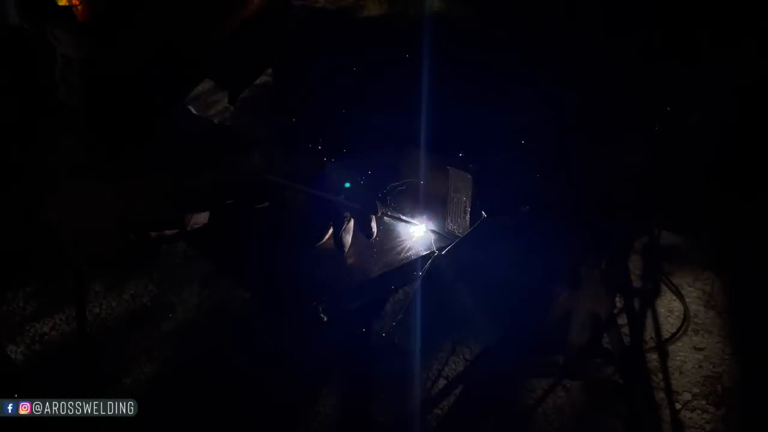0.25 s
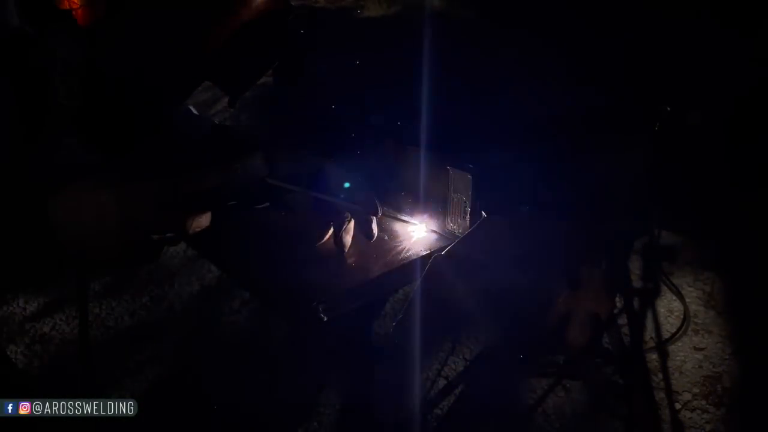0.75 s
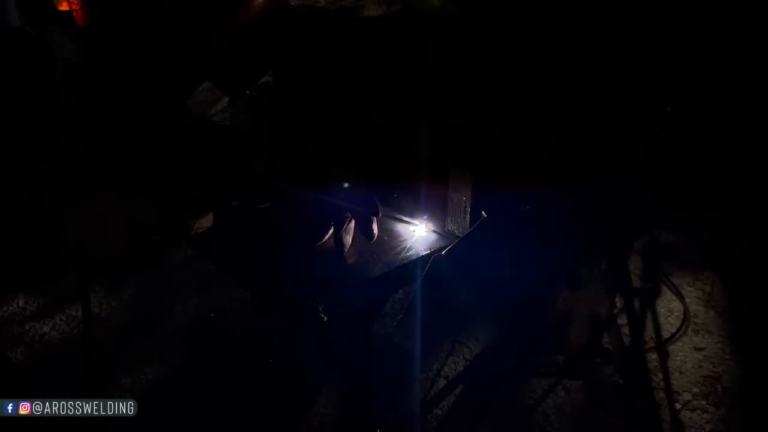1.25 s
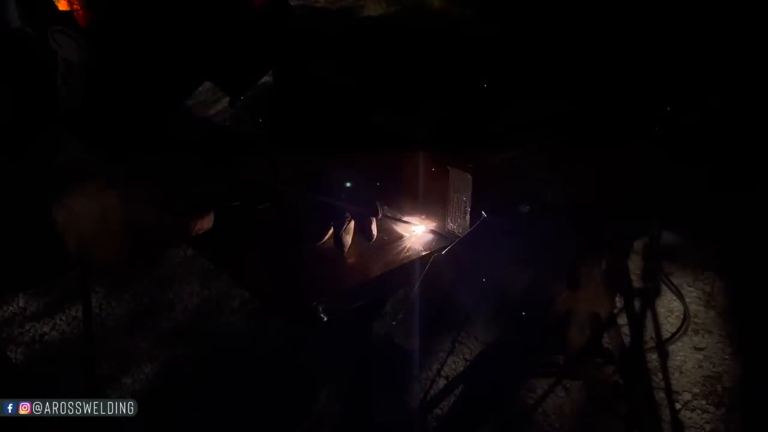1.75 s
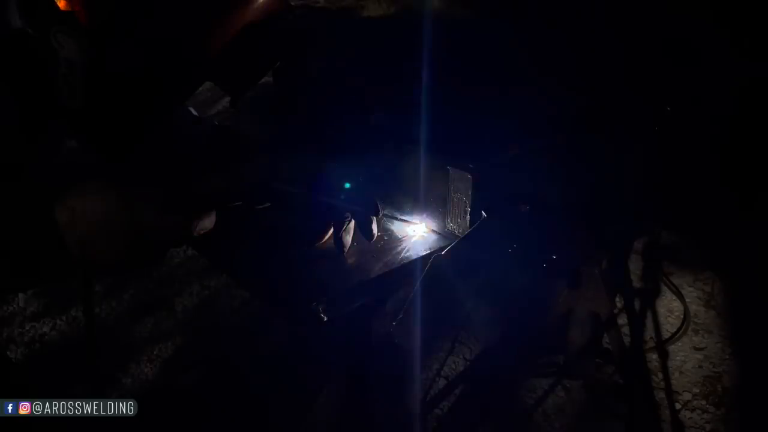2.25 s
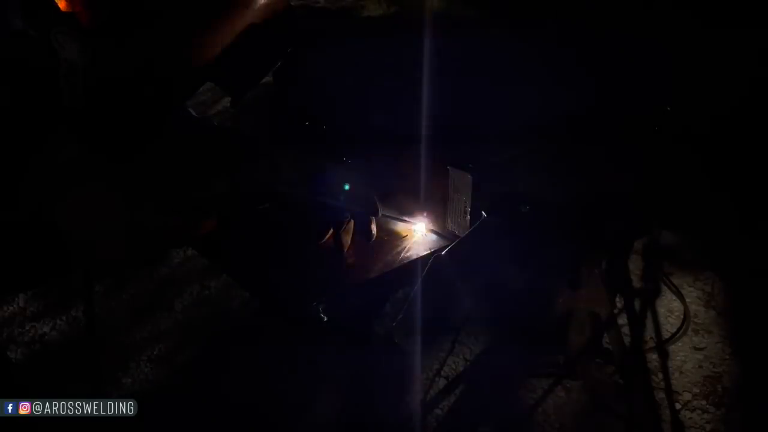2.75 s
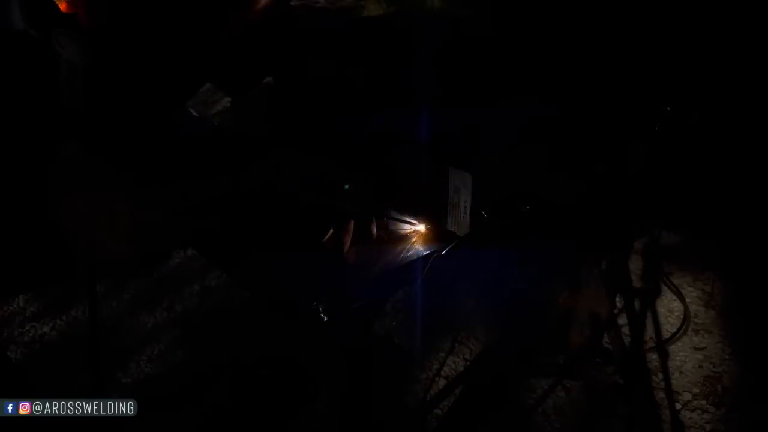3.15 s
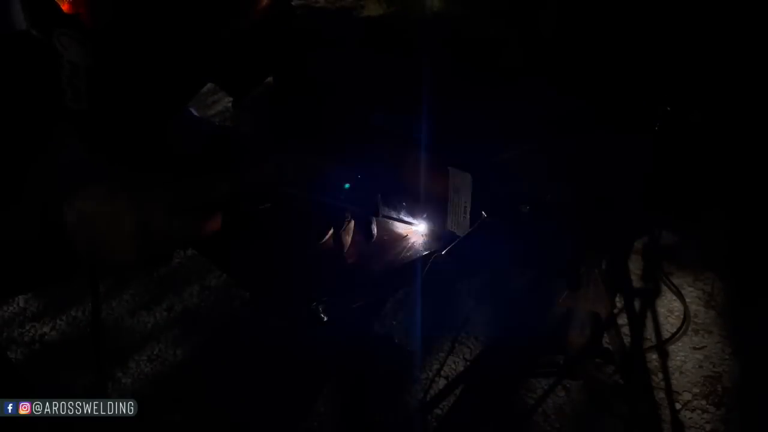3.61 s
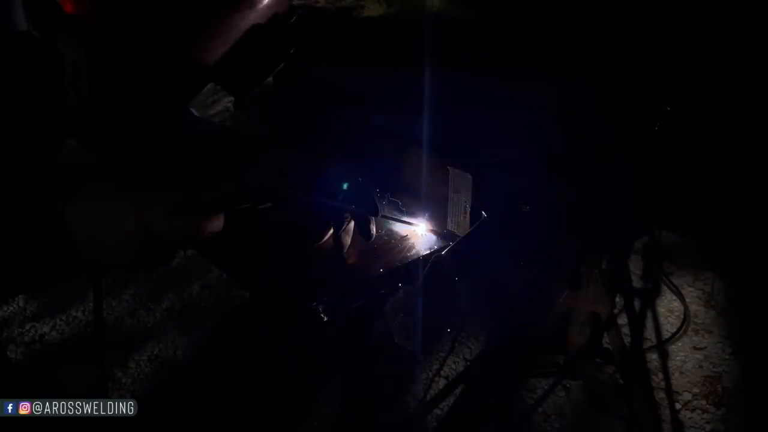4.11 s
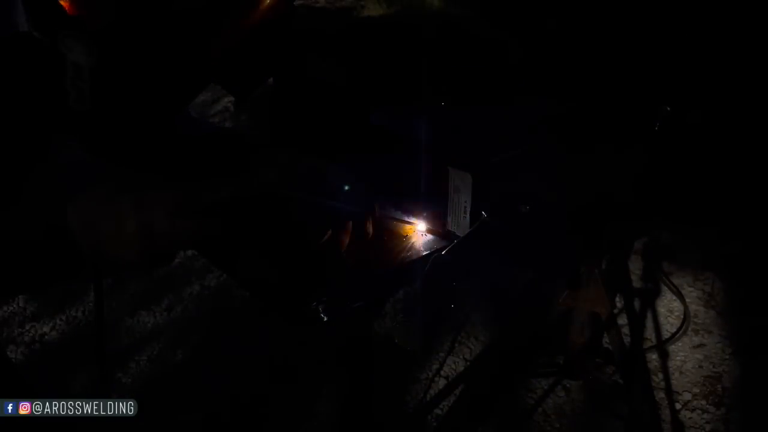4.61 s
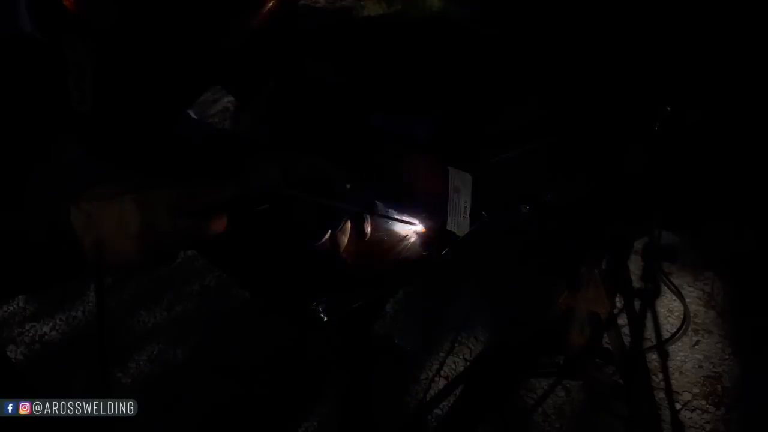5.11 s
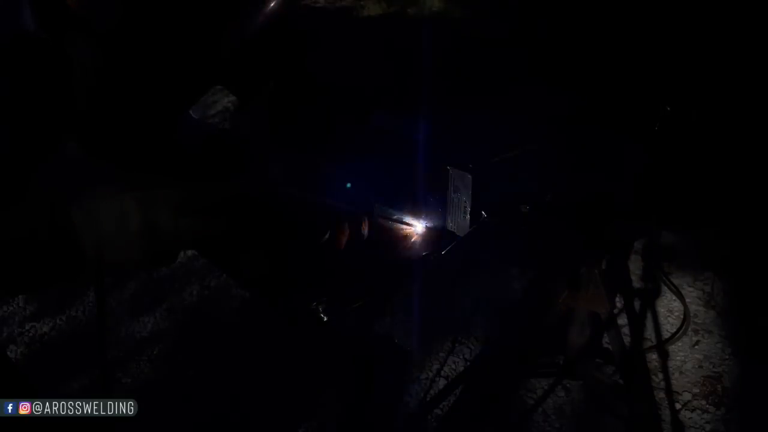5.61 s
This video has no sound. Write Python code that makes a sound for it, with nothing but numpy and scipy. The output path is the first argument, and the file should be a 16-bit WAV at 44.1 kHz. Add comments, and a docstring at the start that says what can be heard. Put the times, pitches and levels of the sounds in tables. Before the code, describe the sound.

Outdoors, an engine-driven welder holds a steady low hum near 59 hertz with a soft noisy roar. Over it a stick arc hisses and crackles brightly on steel, throwing clusters of dry, loud snaps with short fizz and faint metallic ring. From about two seconds wind gusts buffet the microphone in low thumps, making the hum waver and the level dip briefly. Stereo pair, exposed to the wind.

```python
"""The steady drone of an engine-driven welder outdoors is heard first, with a stick arc sizzling on steel.
The engine is exhaust tones locked to its firings over a band of noisy roar.
The arc is hiss and dense crackle, with louder spits that crack, fizz, thud and ring the workpiece.
Gusts buffet the two ports and make the hum waver; single puffs strike, and the level dips briefly three times.
A spaced microphone pair takes engine and arc with a level and phase difference that varies with frequency."""
import sys
import numpy as np
from scipy import signal
from scipy.fft import rfft, irfft, next_fast_len
from scipy.io import wavfile
from scipy.ndimage import uniform_filter1d, map_coordinates

SR = 44100
rng = np.random.default_rng(int(sys.argv[2]) if len(sys.argv) > 2 else 0)


def transcribe(signal):
    """Save signal, clipped to [-1, 1], as a 16-bit WAV file at the path in sys.argv[1]."""
    frames = np.atleast_2d(signal).T
    limited = np.clip(frames, -1, 1)
    pcm = np.round(limited * 32767).astype(np.int16)
    wavfile.write(sys.argv[1], SR, pcm)


N = 258426

# Engine speed: (time [s], firing rate [1/s])
FIRING_RATE = [(0, 58.705), (2, 58.71), (3.8, 58.74), (5.86, 58.77)]
# Lowest exhaust tone as heard through the wind, wavering as gusts beat with it and sinking in the dips:
# (time [s], level before the pair's tilt [dB rms])
HUM_LEVEL = [(0.0, -17), (1.8, -16.5), (1.86, -20.5), (1.91, -18.5), (1.98, -22), (2.08, -16.5),
             (2.12, -21), (2.16, -16), (2.21, -19), (2.25, -15.5), (2.35, -17.5), (2.39, -16.0),
             (2.44, -18), (2.49, -18.5), (2.53, -20.0), (2.59, -16.5), (2.71, -28.5), (2.75, -19),
             (2.78, -27), (2.82, -16), (2.85, -25), (2.89, -20), (2.94, -21.5), (3.03, -15.5),
             (3.13, -19.5), (3.17, -15.5), (3.21, -21.5), (3.25, -15.5), (3.29, -20), (3.33, -15),
             (3.37, -19), (3.43, -22), (3.47, -18), (3.5, -22.5), (3.57, -14), (3.62, -25), (3.65, -18),
             (3.68, -17.0), (3.74, -22), (3.8, -23), (3.9, -14.5), (4.01, -17), (4.06, -19), (4.16, -16),
             (4.19, -16), (4.23, -23.5), (4.31, -21), (4.42, -18.5), (4.46, -16), (4.56, -22.0),
             (4.59, -14), (4.62, -21), (4.65, -15.5), (4.69, -18), (4.72, -15), (4.78, -18.5),
             (4.83, -16.5), (4.87, -20.5), (4.93, -15.5), (4.97, -18), (5.01, -16), (5.05, -18.5),
             (5.16, -16.5), (5.21, -19.5), (5.27, -16.5), (5.33, -18.5), (5.45, -15.5), (5.49, -18.5),
             (5.63, -17), (5.85, -16.5)]
# Exhaust overtones at the opening load; halves and quarters come from unequal cylinders:
# (multiple of the firing rate [-], level [dB rms])
OVERTONES = [(2, -31), (2.25, -38), (2.5, -46.5), (3, -27), (3.25, -45.5), (3.5, -43), (3.75, -48.5),
             (4, -40), (5, -51), (5.5, -53), (6, -40), (6.5, -53), (7, -41.5), (7.5, -50.5), (8, -52.5),
             (9, -46), (9.25, -47), (10, -41), (11, -50)]
# Colour of engine noise and casing: (frequency [Hz], relative density [dB per Hz])
ROAR_COLOUR = [(30, -30), (60, -14.5), (200, -5.5), (300, -8.5), (440, -5.5), (500, -12.5), (600, -9.5),
               (850, -11.5), (980, -15.5), (1230, -13), (1420, -17.5), (2600, -18), (4200, -25.5),
               (16000, -38)]
# Engine roar, the overtones following: (time [s], level [dB rms])
ENGINE_LOAD = [(0, -28), (2, -28), (2.4, -28), (3.3, -30.5), (4.2, -28), (5.86, -29)]
# Colour of the arc: (frequency [Hz], relative density [dB per Hz])
ARC_COLOUR = [(500, -40), (1500, -14), (2000, -9.5), (2350, -3.5), (2700, -3), (3000, -8.5), (3250, -7),
              (4000, -8.5), (4350, -11.5), (5050, -4.5), (5700, -8.5), (6300, -4.5), (6550, -6), (6900, 1),
              (7400, -1.5), (7750, -.5), (8050, -6), (8400, -3), (9300, -3.5), (10200, -7), (10600, -10.5),
              (10850, -8.5), (11800, -14), (12600, -12.5), (13600, -16.5), (14500, -9), (15650, -9),
              (15850, -16)]
# How the arc burns: (time [s], gain of the sizzle [dB], gain of the arc's highest band [dB])
BURN = [(0, -27.5, -4), (.3, -35.5, -4), (.5, -31, -6), (.92, -33.5, -3.5), (1.4, -30.5, -3),
        (1.6, -31, -5), (1.8, -29.5, -1), (2.2, -33.5, -6), (2.3, -30.5, -4), (2.6, -33.5, -5),
        (2.72, -33, -2), (2.81, -30.5, -3), (3.05, -37, -1), (3.45, -33.5, 0), (4.0, -35, 0),
        (4.25, -36, 0), (4.4, -32.5, 2), (4.7, -37.5, -1), (5.15, -32, -2), (5.5, -36, 1.5), (5.86, -34, 1)]
# Loud spits before brightening: (time [s], peak of the upper part [dB], lower part's peak against it [dB])
LOUD_SPITS = [(0.061, -12, -20), (0.066, -12, -14), (0.0866, -14, -19), (0.1048, -15, -17),
              (0.1166, -5, -21), (0.146, -11, -8), (0.185, -17, -6), (0.2364, -10, -7), (0.241, -10, -7),
              (0.3433, -5.5, -6), (0.3536, -8, -8), (0.3576, -1.5, -7.5), (0.3688, -2.5, -18),
              (0.436, -20, 2), (0.4617, -12, -20), (0.4635, -16, -11), (0.485, -8, -12), (0.4866, -8, -7),
              (0.5149, -10, 0), (0.5237, -8, -13), (0.5268, -5.5, -9), (0.538, -16, -11),
              (0.5787, -8.5, -13), (0.5927, -3, -12), (0.6043, -4.5, -7.5), (0.6099, -3, -12),
              (0.6996, -12, -10), (0.7147, -6, -16), (0.7281, -8, -11), (0.7432, -10, -16),
              (0.8249, -8, -7), (0.8482, -12, -4), (0.857, -9.5, -3), (0.8684, -6.5, -6), (0.8717, -6, -19),
              (0.8735, -5, -18), (0.877, -7, -12), (0.8786, -12.5, -14), (0.949, -1.5, -16),
              (0.9584, -3.5, -20), (1.0131, -8, -17), (1.016, -11, -11), (1.0243, -9, -15),
              (1.031, -6, -12), (1.039, -4, -21), (1.0413, -10, -16), (1.0533, -1.5, -27),
              (1.0594, -16, -16), (1.135, -6.5, -8), (1.1448, -10, -10), (1.1524, -2, -12),
              (1.1984, -8, -18), (1.2381, -9, -9), (1.2607, -6, -7), (1.275, -20, -19), (1.32, -9, -17),
              (1.3229, -13, -13), (1.3567, -18, -14), (1.3762, -16, -12), (1.4013, -13, -18),
              (1.4034, -13, -16), (1.422, -9, -13), (1.426, -12.0, -12), (1.4314, -8, -14),
              (1.4497, -11, -12), (1.4529, -7, -9), (1.4605, -7, -14), (1.4648, -19, -16),
              (1.4737, -23, -15), (1.5565, -5, -10), (1.5581, -4.5, -6), (1.5634, -12.0, -17),
              (1.697, -13.0, -14), (1.708, -2.5, -11), (1.711, -6, -9), (1.7128, -8.5, -18),
              (1.7189, -13.5, -13), (1.763, -7, -22), (1.767, -11, -18), (1.7807, -6, -5.5),
              (1.7924, -3, -11), (1.795, -9, -16), (1.8015, -15, -11), (1.808, -3, -10), (1.8148, -2, -11),
              (1.882, -4, -12), (1.8929, -3, -7), (1.8948, -2, -10), (1.943, -12, -16), (1.9915, -9, -7),
              (2.1056, -11, -18), (2.119, -9, -14), (2.1629, -5, -6), (2.1732, -11, -6),
              (2.1752, -4.5, -20), (2.187, -14, 4), (2.3547, -6.5, -15), (2.362, -13, -15),
              (2.3649, -9, -12), (2.3737, -2, -10), (2.3763, -16, -11), (2.3775, -2.5, -13),
              (2.382, -6, -16), (2.4804, -6, -13), (2.4856, -5, -9), (2.4905, -3, -9), (2.5132, -13.0, -18),
              (2.514, -12, -16), (2.5174, -4.5, -23), (2.521, -5, -12), (2.543, -9, -13), (2.548, -6, -10),
              (2.5678, -7, -10), (2.6, -11, -8), (2.61, -12, -14), (2.6223, -5.5, -12), (2.637, -5, -21),
              (2.641, -3, -17), (2.6425, -6, -8), (2.826, -5, -12), (2.8399, -6.5, -16),
              (2.8493, -9.5, -12), (2.8555, -8, -11), (2.8638, -11.5, -6), (2.871, -9.0, -12),
              (2.8755, -6, -10), (2.882, -3, -13), (2.889, 0, -11.5), (2.8925, -5, -17), (2.8984, -9, -5),
              (2.917, -14, -9), (3.0322, -8, -14), (3.0384, -6, -12), (3.061, -5, -11), (3.0637, -4, -14),
              (3.1358, -4, -16), (3.14, -9, -9), (3.144, -8, -12), (3.1484, -5.5, -13), (3.156, -9, -13),
              (3.1582, -7, -10), (3.1643, -3.5, -14), (3.1928, -4, -13.5), (3.2468, -8.0, -13),
              (3.2503, -8, -14), (3.255, -9, -10), (3.2593, -9, -17), (3.264, -7, -16), (3.2681, -4, -14),
              (3.2759, -6, -14), (3.349, -21, -19), (3.365, -10, -21), (3.4557, -3.5, -21),
              (3.5476, -12, -24), (3.5498, -15, -20), (3.552, -13.5, -14), (3.5856, -5.5, -25),
              (3.594, -5, -16), (3.6656, -7, -19), (3.674, -14, -11), (3.6903, -12.5, -17),
              (3.713, -15, -7), (3.7431, -6, -14), (3.7734, -8.5, -18), (3.8044, -13, -18),
              (3.8532, -9.5, -7), (3.9428, -11.5, -11), (3.949, -11, -13), (3.977, -14, -18),
              (4.0084, -15, -21), (4.0168, -7, -23), (4.0234, -10, -18), (4.037, -26, -20),
              (4.0456, -3, -15), (4.113, -10, -17), (4.1456, -8, -20), (4.1774, -10, -15),
              (4.1802, -5, -20), (4.1841, -4.5, -11), (4.1945, -6.5, -14), (4.197, -6, -17),
              (4.3788, -7, -12), (4.444, -10, -20), (4.524, -11, -17), (4.5571, -6, -15), (4.6575, -9, -13),
              (4.7012, -10, -9), (4.7537, -10, -12), (4.758, -7.5, -19), (4.8006, -11, -6),
              (4.8054, -2.5, -5.5), (4.8579, -4.5, -18), (4.9924, -4.5, -11), (4.994, -6, -16),
              (4.9964, -11, -9), (5.04, -11.5, -18), (5.1032, -11, -20), (5.108, -6, -27),
              (5.1199, -13, -23), (5.1362, -7, -18), (5.19, -8, -17), (5.1956, -16, -16),
              (5.2018, -4.5, -21), (5.304, -8, -18), (5.3102, -12, -18), (5.3143, -8, -15),
              (5.358, -7, -12), (5.3643, -5.5, -17), (5.426, -8, -9), (5.4444, -6.5, -14),
              (5.5443, -10, -5), (5.5486, -13, -7), (5.5552, -7, -6), (5.7256, -8.5, -20),
              (5.7712, -9, -15), (5.7966, -3.5, -7), (5.8562, -10.5, -9)]
# Ringing modes of the workpiece: (frequency [Hz], relative level [dB], decay by 60 dB [s])
STEEL_MODES = [(1040, -3, 0.026), (1240, -3.5, 0.016), (2393, -0.5, 0.013), (2752, -3.5, 0.026),
               (3335, -9, 0.009), (5050, -10, 0.0052), (6450, -26, 0.02), (6870, -5, 0.022),
               (7130, -7.5, 0.025), (9500, -40, 0.0077)]
# Gusts before the dips: (time [s], buffet alike at both ports [dB], buffet opposite at the two ports [dB])
GUSTS = [(0, -42, -50), (1.7, -34, -38), (2.1, -31, -32), (2.3, -28, -42), (2.64, -30, -36),
         (2.72, -21, -31), (3, -32, -36), (3.3, -26.5, -34), (3.55, -30, -30), (3.7, -26, -33),
         (4.1, -31, -21), (4.2, -21.5, -41), (4.42, -28, -30), (4.7, -25.5, -33), (4.8, -34, -35),
         (5.2, -31, -40), (5.86, -35, -40)]
# Colour of the buffeting: (frequency [Hz], relative density [dB per Hz])
BUFFET_COLOUR = [(15, -29), (30, -16), (42, 3.5), (52, -8), (66, -0.5), (80, 3.5), (105, -4.5),
                 (135, -12.5), (170, -15.5), (300, -24), (600, -61)]
# Single puffs before the dips: (time [s], peak [dB], pulse frequency [Hz])
PUFFS = [(1.809, -21, 90), (1.961, -30, 85), (2.14, -15, 90), (2.379, -18, 88.5), (2.53, -30, 90),
         (2.879, -12.5, 90), (2.93, -29, 85), (3.301, -17, 110), (3.483, -21, 84), (3.688, -26, 110),
         (3.722, -18, 120), (3.74, -13.5, 109), (3.772, -16, 120), (3.88, -26, 85), (4.199, -14.5, 482),
         (4.201, -13, 209), (4.454, -13, 89), (4.622, -15.5, 90), (4.657, -13, 90), (4.701, -16, 90.5),
         (4.929, -20, 85), (5.1454, -21, 190), (5.151, -5.5, 119)]
# Brief level dips: (time [s], depth [dB], hold [s], recovery [s])
DIPS = [(1.823, 3, 0.09, 0.17), (2.648, 6, 0.097, 0.13), (4.201, 5, 0.033, 0.32)]
# Phase between the microphones: (frequency [Hz], lead of the left [rad])
LEFT_LEAD = [(0, 0), (60, -.13), (180, -.8), (520, -2.3), (1210, -2.6), (2840, -6), (3600, -6.3),
             (4820, -4.9), (6550, -5.8), (8400, -3.14), (10600, 0), (12700, 3.14), (14900, 6.28),
             (15800, 7)]
# Likeness of diffuse noise at the two microphones: (frequency [Hz], left-right likeness [-])
LIKENESS = [(60, 0.96), (300, 0.92), (1000, 0.73), (2600, 0.42), (3300, 0.57), (3900, 0.17), (5000, 0.067),
            (7000, 0.97), (15000, 1)]
# Balance of the microphones: (frequency [Hz], left minus right [dB])
LEFT_TILT = [(60, .5), (200, 1.5), (400, -3), (1300, -2), (2100, -1), (2700, 4), (3000, 2.5), (3400, 1.5),
             (4000, 6.5), (4400, -2), (5050, 3.5), (5900, -1.5), (7500, -5), (8500, 0)]

TOP_HZ = 15850  # band limit
SMALL_DB, SMALL_SCATTER_DB, SMALL_LOW_DB = -18.5, 0.5, -11.5  # small spits: base peak, scatter, lower part
FLURRY_S, LONERS = 0.017, 0.45  # scale of a small spit's lag behind a loud one; share falling at any time
FOLLOW = 0.62  # small spits grow and shrink with the burn, dB per dB
SNAP_DB = 1.5  # lift of a spit's upper part, nearing this many dB an octave well above 8 kHz
FLARE_DB, FLARE_S = 0.85, 0.015  # the sizzle swells around spits: dB per rms of activity, half-width
ECHO_S, ECHO_DB = .0011, -19  # a spit's copy off the steel: typical delay and level
FIZZ_DB, FIZZ_S = -13, 0.0071  # a spit's fizz: level before its two shares, decay by 60 dB
SPLIT_S, SPLIT = .0003, .4  # second crack of a spit: typical gap and typical size against the first
LEAN_DB = 2  # the lower part of a spit is stronger on the left
BROAD = .45  # share of the arc's colour, in dB, kept by the lower part of a spit
THUD_DB, THUD_HZ = -9.5, 1030  # blunt body under the lower part of a spit
RING_DB, BED_RING_DB = -20, -11  # steel ringing: drive from the spits; level under the sizzle
TAIL = 1.16  # a puff leaves more slowly than it arrives


def amp(db):
    """Gain of a level in dB."""
    return 10 ** (np.asarray(db) / 20)


def unit(x):
    """x at rms 1."""
    return x / np.sqrt(np.mean(x ** 2) + 1e-20)


def along(points, hz):
    """(frequency, value) points read on a log frequency axis."""
    f, v = np.transpose(points)
    return np.interp(np.log(hz + 1), np.log(f + 1), v)


def curves(rows):
    """One value per sample for each column after the time."""
    s, *cols = np.transpose(rows)
    return [np.interp(np.arange(N) / SR, s, c) for c in cols]


def curve(rows):
    """The only column after the time, per sample."""
    return curves(rows)[0]


def wobble(rate):
    """A smooth random curve with rate knots a second."""
    coarse = np.arange(0, N + 64, 64)
    knots = rng.standard_normal(int(N * rate / SR) + 4)
    return np.interp(np.arange(N), coarse, map_coordinates(knots, [coarse * rate / SR]))


def filtered(x, response):
    """x times a complex response of frequency."""
    m = next_fast_len(N + SR // 2)
    return irfft(rfft(x, m) * response(np.fft.rfftfreq(m, 1 / SR)), m)[..., :N]


def causal(gain):
    """Minimum-phase form of a gain: the same colour with nothing sounding before the blow."""
    cepstrum = irfft(np.log(gain + 1e-6))
    cepstrum[1:len(cepstrum) // 2] *= 2
    cepstrum[len(cepstrum) // 2 + 1:] = 0
    return np.exp(rfft(cepstrum))


def spread(pair, spectrum):
    """A mid and a side signal, coloured and mixed to the left-right likeness."""
    turn = lambda hz: np.arccos(np.clip(along(LIKENESS, hz), 0, 1)) / 2
    shares = lambda hz: np.array([np.cos(turn(hz)), np.sin(turn(hz))])
    mid, side = filtered(pair, lambda hz: amp(along(spectrum, hz)) * shares(hz))
    return np.array([mid + side, mid - side])


def patchy(x, depth_db):
    """x with random patches of gain over time and frequency, alike on both sides."""
    z = signal.stft(x, nperseg=256)[2]
    field = uniform_filter1d(rng.standard_normal(z.shape[-2:]), size=3, axis=0)
    field = uniform_filter1d(field, size=5, axis=1)
    return signal.istft(z * amp(depth_db * unit(field)), nperseg=256)[1][..., :N]


def crank():
    """Phase of the firing cycle in radians, summed from the firing rate."""
    return 2 * np.pi * np.cumsum(curve(FIRING_RATE)) / SR + 2.87


def hum():
    """The lowest exhaust tone as heard through the wind: one cycle per firing, its level wavering."""
    return -np.sqrt(2) * amp(curve(HUM_LEVEL)) * np.cos(crank())


def engine():
    """Overtones ride on each firing as a skewed downward pulse; the roar swells a little once per firing."""
    turn = crank()
    lag = lambda k: .1 * (k - 1) ** 2 + 1.0 * (k % 2 == 0)  # the pipe delays high and even overtones
    tones = 0
    for k, db in OVERTONES:
        level = amp(db + 0.15 * k * wobble(12))
        tones = tones - np.sqrt(2) * level * np.cos(k * turn - lag(k) + 0.046 * k * wobble(9))
    swell = amp(0.26 * np.cos(turn) + 0.39 * wobble(6.2) + 0.74 * wobble(18))
    noise = patchy(rng.standard_normal((2, N)), depth_db=2.0)
    roar = unit(spread(swell * noise, ROAR_COLOUR))
    opening_db = ENGINE_LOAD[0][1]
    return amp(curve(ENGINE_LOAD)) * (amp(-opening_db) * tones + roar)


def sparks(at, size, t60=.005):
    """Each spark is a click, a copy off the steel beside it and a short fizz, as a mid and a side signal."""
    clicks = np.bincount(np.clip(at, 0, N - 1), size, N)
    t = np.arange(SR // 50) / SR
    envelope = np.abs(signal.fftconvolve(clicks, amp(-60 * t / t60))[:N])
    fizz = amp(-13) * envelope * rng.standard_normal((2, N))
    echo = np.roll(clicks, round(.0011 * SR))
    side_clicks = np.roll(clicks, round(.0003 * SR))
    return fizz + [clicks + 0.23 * echo, side_clicks - 0.99 * echo]


def steel(blows):
    """The workpiece's modes rung by blows as dying sines; the sharing among modes wanders."""
    t = np.arange(SR // 20) / SR
    ring = lambda hz, db, t60: amp(db - 60 * t / t60) * np.sin(2 * np.pi * hz * t)
    return sum(signal.oaconvolve(amp(2.8 * wobble(60)) * blows, ring(*mode))[:N] for mode in STEEL_MODES)


def sizzle(spit, db, burn_db):
    """Hiss and dense crackle, the crackle ringing the steel, come in clumps and lulls and swell around spits."""
    busy = np.bincount(spit, amp(db), N)
    busy = unit(signal.fftconvolve(busy, np.hanning(round(2 * FLARE_S * SR)), "same"))
    clumps = wobble(13)
    hiss = amp(2.0 * clumps + 0.51 * wobble(40)) * rng.standard_normal((2, N))
    draw = rng.random((6000, 2))
    at = (draw[:, 0] * N).astype(int)
    size = amp(-4.5 * np.log(draw[:, 1] + 0.027) + 2.0 * clumps[at])  # many small, few large
    crackle = unit(spread(sparks(at, size), ARC_COLOUR))
    ringing = unit(steel(np.bincount(at, size, N)))
    bed = amp(-2.5) * unit(spread(hiss, ARC_COLOUR)) + amp(1.5) * crackle + amp(BED_RING_DB) * ringing
    return amp(burn_db + FLARE_DB * (busy - busy.mean())) * patchy(bed, depth_db=2.5)


def small_spits(count=260):
    """Rows like the loud spits: some fall anywhere, the others trail a loud one."""
    pick, push = rng.random((count, 2)).T, rng.standard_normal((count, 3)).T
    leader = np.transpose(LOUD_SPITS)[0][(pick[1] * len(LOUD_SPITS)).astype(int)]
    s = np.where(pick[0] < LONERS, pick[1] * N / SR, leader + FLURRY_S * np.abs(push[0]))
    db = SMALL_DB + SMALL_SCATTER_DB * np.minimum(push[1], 1)
    return np.transpose([s, db, SMALL_LOW_DB + 3.6 * np.minimum(push[2], 1)])


def snaps(at, size, chance):
    """Dry double cracks, alike on both sides, each with its own faint copy and a short fizz."""
    hit = lambda i, g: np.bincount(np.clip(i, 0, N - 1), g, N)
    late = at + np.round(ECHO_S * SR * amp(3.9 * chance[0])).astype(int)
    echo = hit(late, size * amp(ECHO_DB + 2.6 * chance[1]))
    t = np.arange(SR // 50) / SR
    envelope = np.abs(signal.fftconvolve(hit(at, size), amp(FIZZ_DB - 60 * t / FIZZ_S))[:N])
    both, each = rng.standard_normal(N), rng.standard_normal((2, N))
    second = SPLIT * np.clip(chance[3], -1.5, 1.5)
    split = at + np.round(SPLIT_S * SR * amp(4 * chance[2])).astype(int)
    first_size = size / np.hypot(1, second)  # the two cracks keep the energy of one
    crack = hit(at, first_size) + hit(split, first_size * second)
    return crack - echo + envelope * (0.34 * both + 0.41 * each)


def spits(spit, db, low_db):
    """Cracks in the arc's colour, split into upper and lower parts, with a thud and ringing steel."""
    chance = rng.standard_normal((len(spit), 4)).T
    colour = lambda hz, keep=1: causal(amp(keep * along(ARC_COLOUR, hz)))
    share = lambda hz: 1 / (1 + (hz / 4200) ** 6)  # lower part
    grid = np.linspace(0, SR / 2, 2048)
    # height of a unit click in one part of the arc's colour
    peak = lambda part, keep=1: np.abs(signal.hilbert(irfft(colour(grid, keep) * part))).max()
    high = filtered(snaps(spit, amp(db), chance), colour) / peak(1 - share(grid))
    high = filtered(high, lambda hz: (1 - share(hz)) * amp(SNAP_DB * np.log2(1 + hz / 8000)))
    low = filtered(snaps(spit, amp(db + low_db), chance), lambda hz: colour(hz, BROAD))
    low = filtered(low / peak(share(grid), BROAD) * amp([[LEAN_DB / 2], [-LEAN_DB / 2]]), share)
    blows = np.bincount(spit, amp(db + low_db), N)
    t = np.arange(SR // 200) / SR
    body = np.sin(2 * np.pi * THUD_HZ * t) * np.exp(-1.5 * THUD_HZ * t)
    # opposite in sign before the pair's lead, which brings the two sides nearly into step
    thud = signal.oaconvolve(blows, body)[:N] * [[1], [-1]]
    ringing = steel(np.bincount(spit, amp(db + low_db / 2), N))
    return high + low + amp(THUD_DB) * thud + amp(RING_DB) * ringing


def arc():
    """The sizzle and the loud and small spits; a sharper arc lifts the highest band."""
    burn_db, sharp_db = curves(BURN)
    s, db, low_db = np.transpose(np.vstack([LOUD_SPITS, small_spits()]))
    spit = np.clip(np.round(s * SR).astype(int), 0, N - 1)
    small = np.arange(len(s)) >= len(LOUD_SPITS)
    db = db + small * FOLLOW * (burn_db - burn_db.mean())[spit]
    both = sizzle(spit, db, burn_db) + spits(spit, db, low_db)
    top = filtered(both, lambda hz: 1 / (1 + (11500 / (hz + 1)) ** 12))
    return both + (amp(sharp_db) - 1) * top


def buffeting():
    """Lumpy low wind noise, part alike at both ports and part opposite at the two."""
    alike_db, opposite_db = curves(GUSTS)
    lumps = amp(2.1 * wobble(11.0)) * rng.standard_normal((2, N))
    alike, opposite = filtered(lumps, lambda hz: amp(along(BUFFET_COLOUR, hz)))
    return amp(alike_db) * unit(alike) + amp(opposite_db) * unit(opposite) * [[1], [-1]]


def puffs():
    """Single downward pressure pulses with upward shoulders, alike at both ports."""
    pressure = np.zeros(N)
    for s, db, hz in PUFFS:
        u = (np.arange(N) / SR - s) * hz * np.pi
        u = np.where(u > 0, u / TAIL, u)
        pressure -= amp(db) * (1 - 2 * u ** 2) * np.exp(-np.minimum(u ** 2, 50))
    return pressure


def level_dips():
    """A sudden drop in level that holds, then climbs back in a straight line in dB."""
    t = np.arange(N) / SR
    drop_db = 0
    for s, db, hold, back in DIPS:
        fall = np.clip((t - s) / 0.0068, 0, 1)
        drop_db = drop_db + db * fall * np.clip(1 - (t - s - hold) / back, 0, 1)
    return amp(-drop_db)


def scene():
    """Engine and arc reach the spaced pair with its tilt and lead; wind acts on the ports directly."""
    f, lead = np.transpose(LEFT_LEAD)
    half = lambda hz: amp(along(LEFT_TILT, hz) / 2) * np.exp(.5j * np.interp(hz, f, lead))
    dip = level_dips()
    field = hum() + dip * (engine() + arc())  # the hum's own level curve already sinks in the dips
    at_pair = filtered(field, lambda hz: np.array([half(hz), 1 / half(hz)]))
    return at_pair + dip * (buffeting() + puffs())


def record(dry):
    """Nothing is kept above the band limit."""
    return filtered(dry, lambda hz: hz < TOP_HZ)


dry = scene()
out = record(dry)
transcribe(out)
```